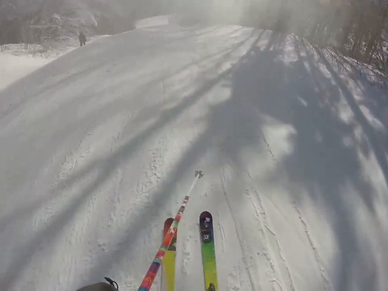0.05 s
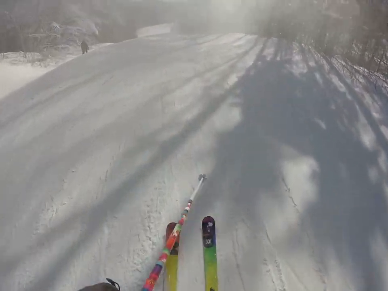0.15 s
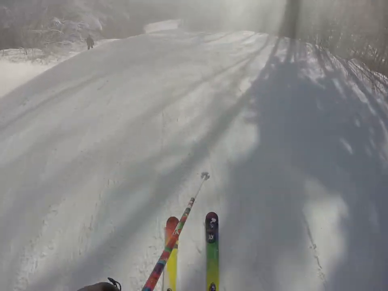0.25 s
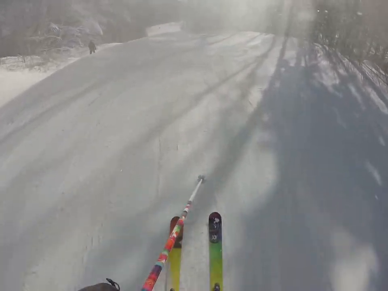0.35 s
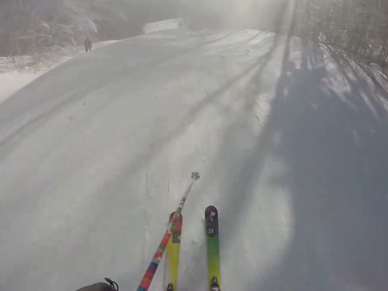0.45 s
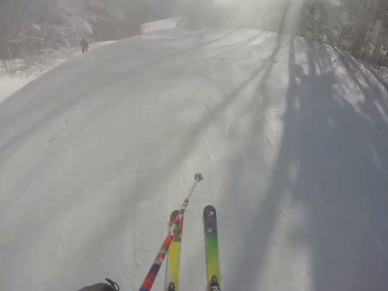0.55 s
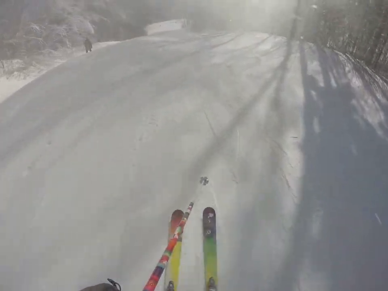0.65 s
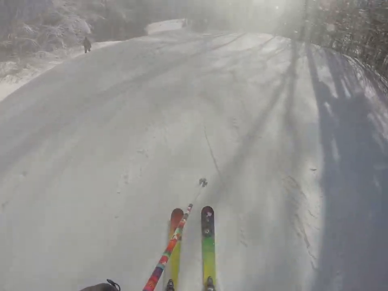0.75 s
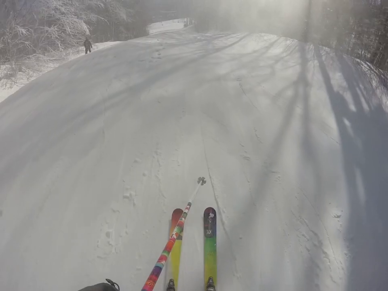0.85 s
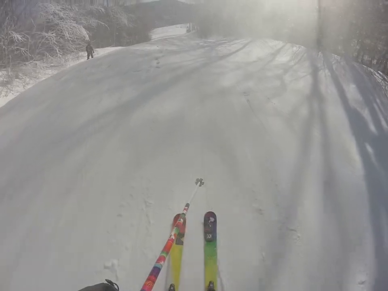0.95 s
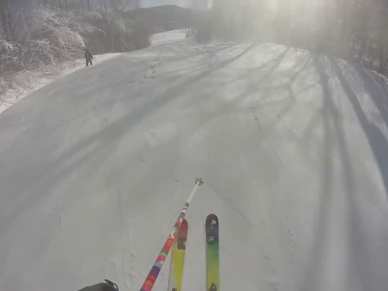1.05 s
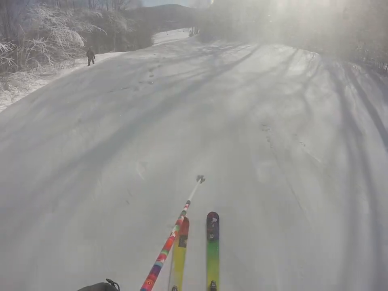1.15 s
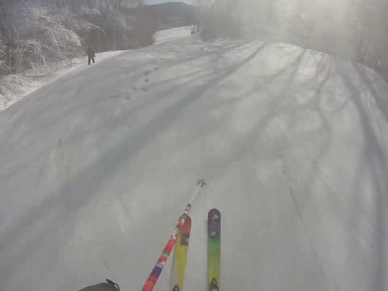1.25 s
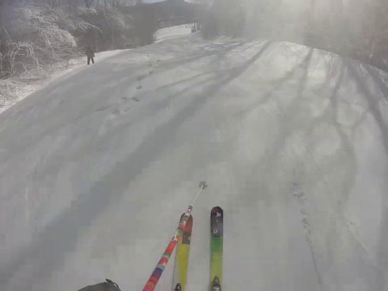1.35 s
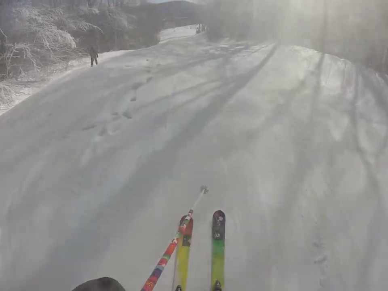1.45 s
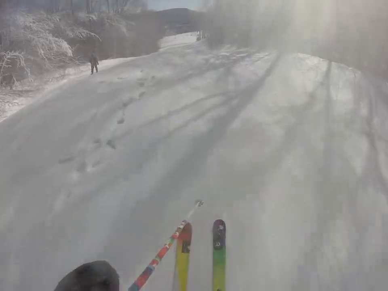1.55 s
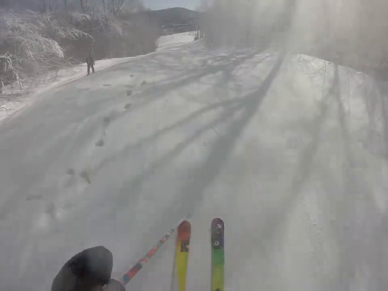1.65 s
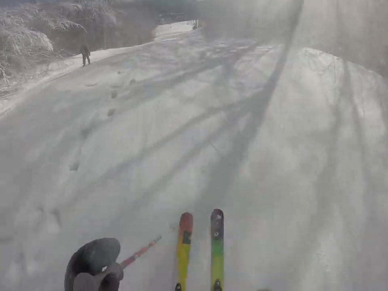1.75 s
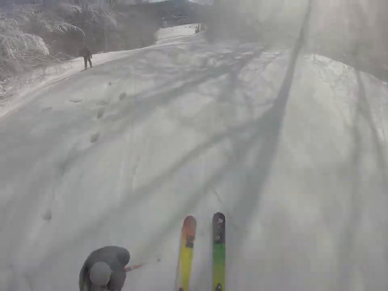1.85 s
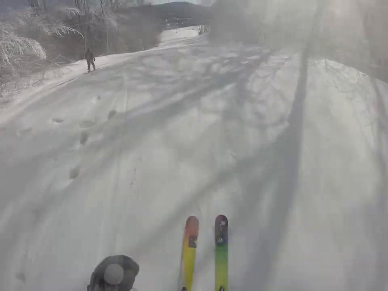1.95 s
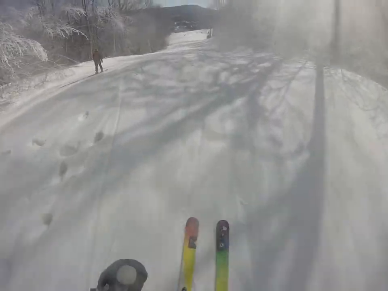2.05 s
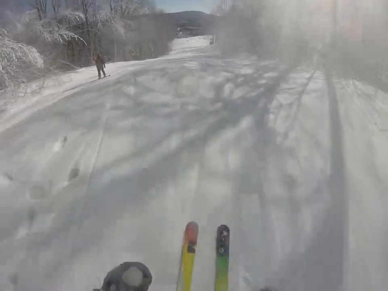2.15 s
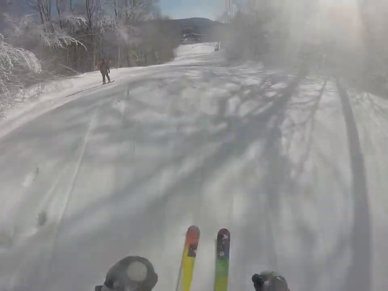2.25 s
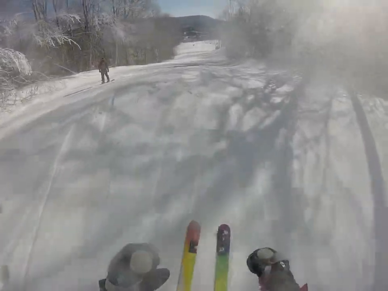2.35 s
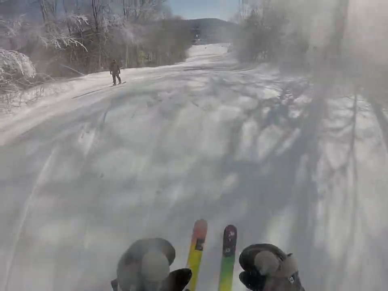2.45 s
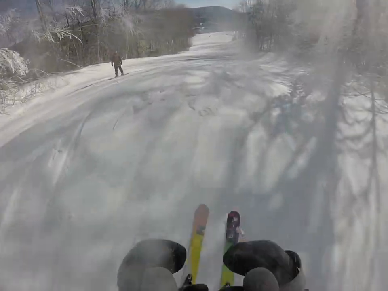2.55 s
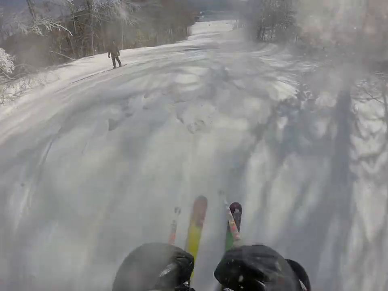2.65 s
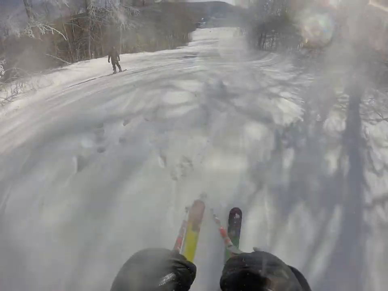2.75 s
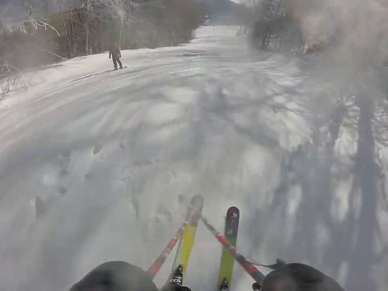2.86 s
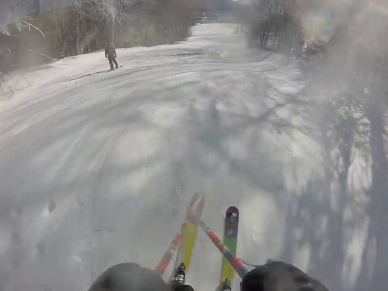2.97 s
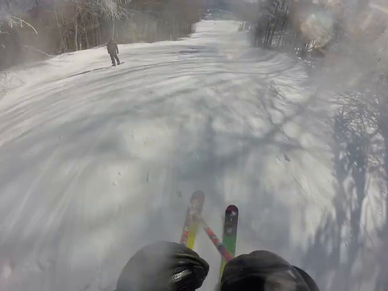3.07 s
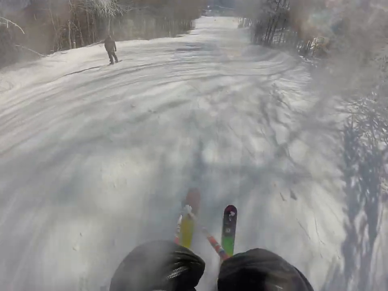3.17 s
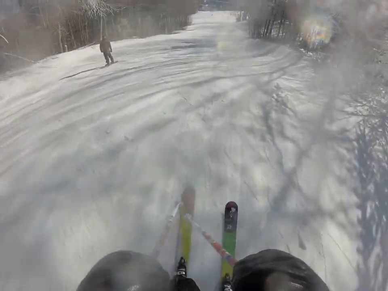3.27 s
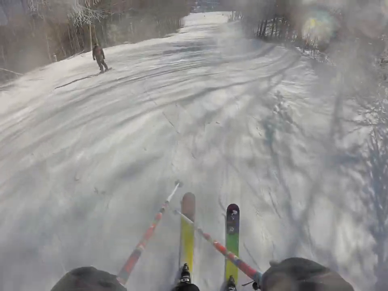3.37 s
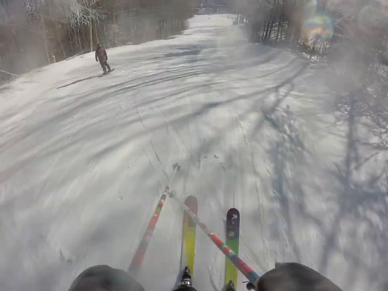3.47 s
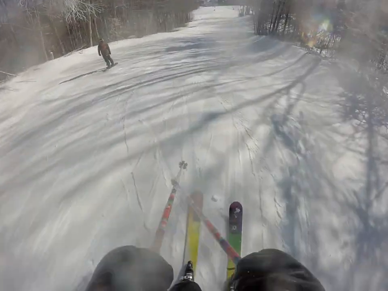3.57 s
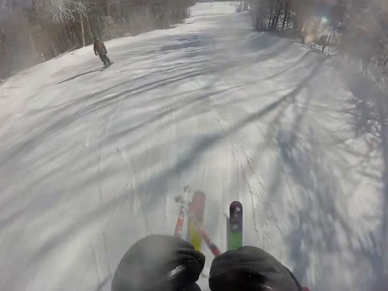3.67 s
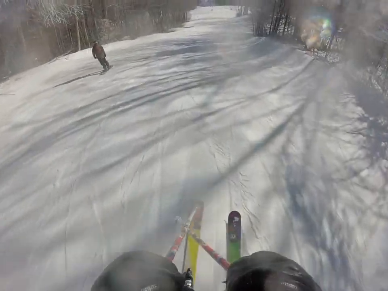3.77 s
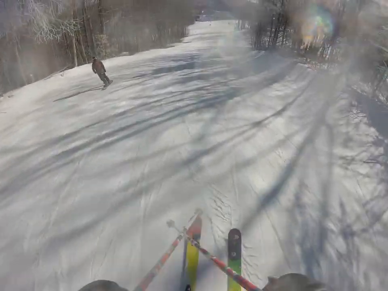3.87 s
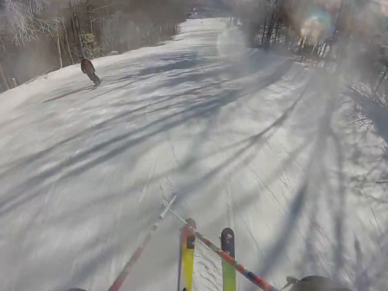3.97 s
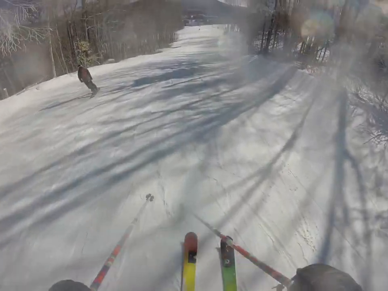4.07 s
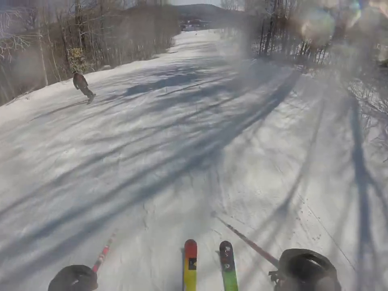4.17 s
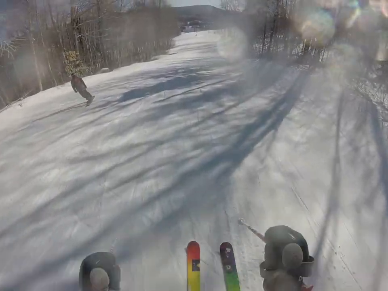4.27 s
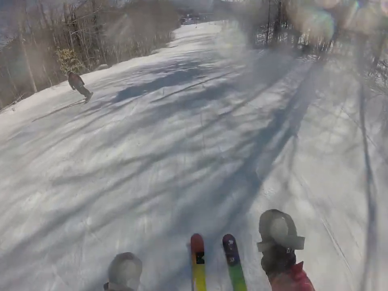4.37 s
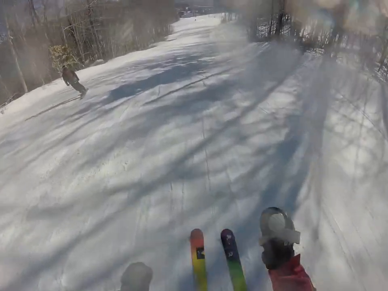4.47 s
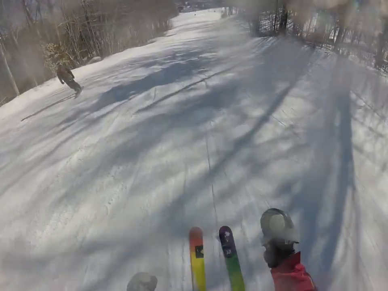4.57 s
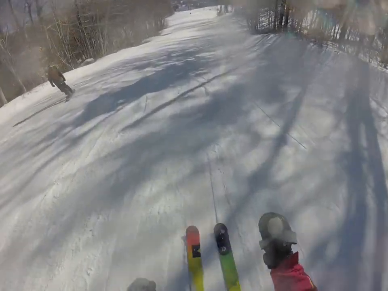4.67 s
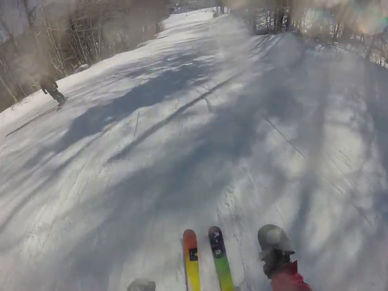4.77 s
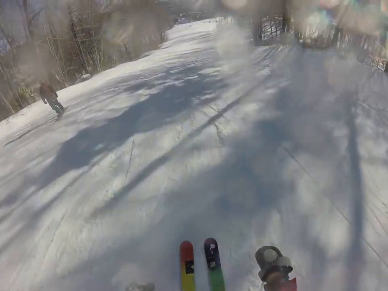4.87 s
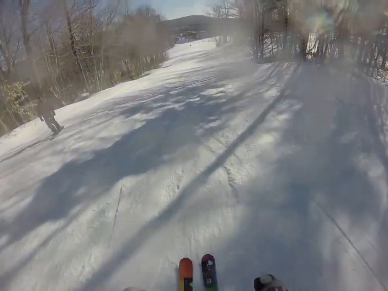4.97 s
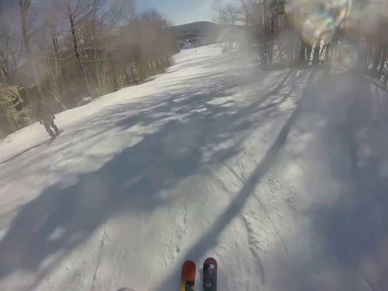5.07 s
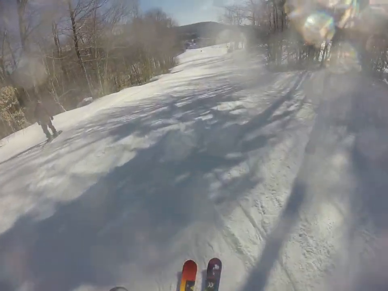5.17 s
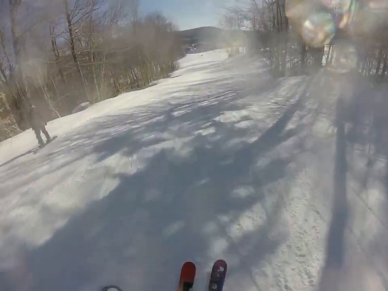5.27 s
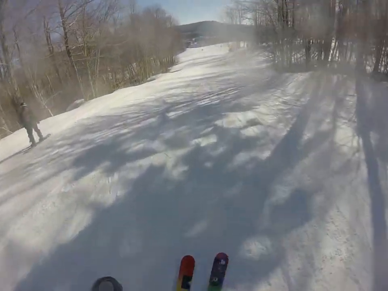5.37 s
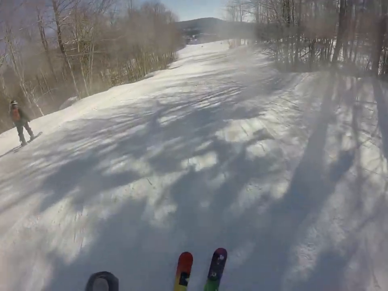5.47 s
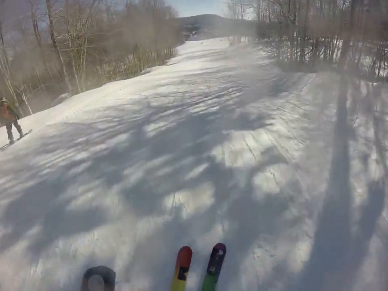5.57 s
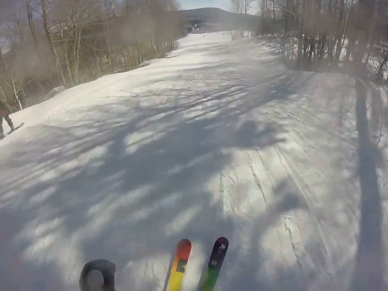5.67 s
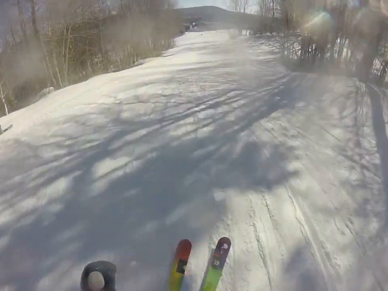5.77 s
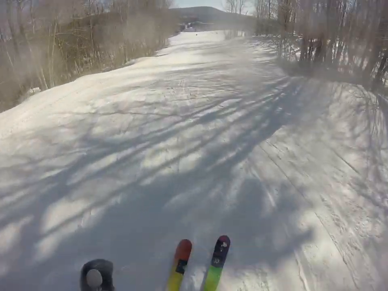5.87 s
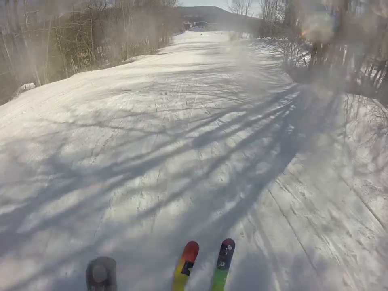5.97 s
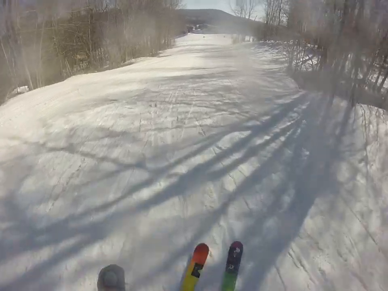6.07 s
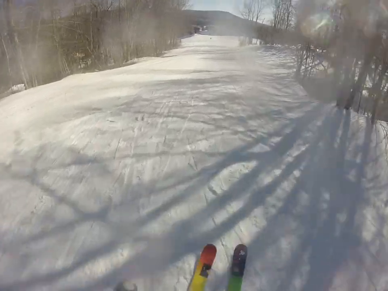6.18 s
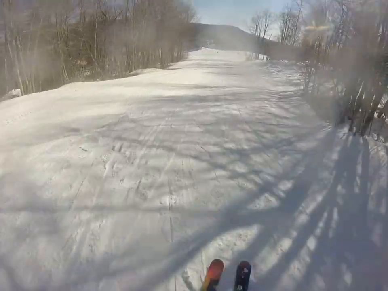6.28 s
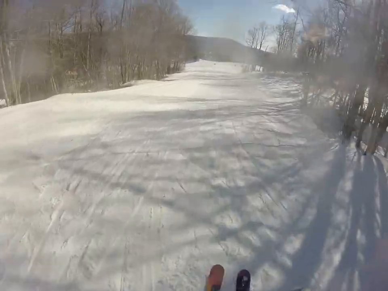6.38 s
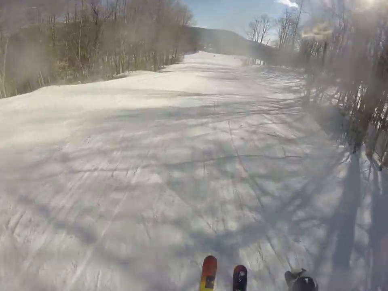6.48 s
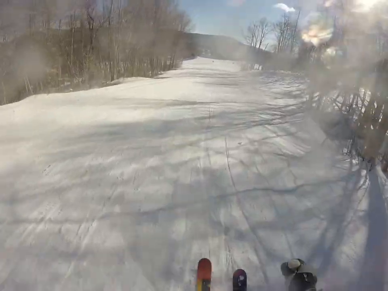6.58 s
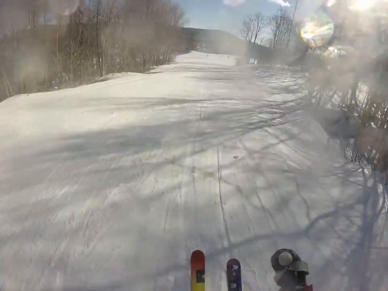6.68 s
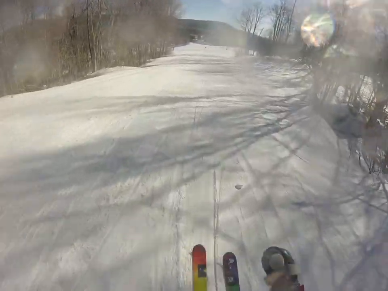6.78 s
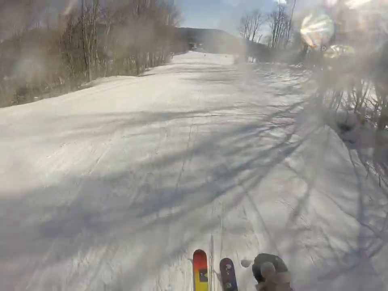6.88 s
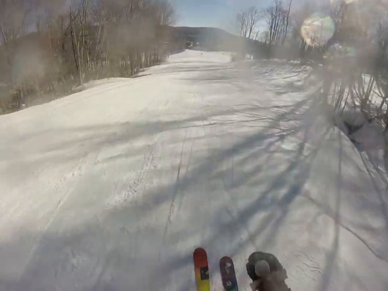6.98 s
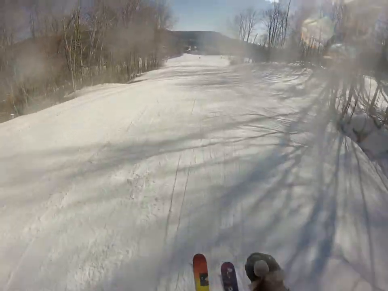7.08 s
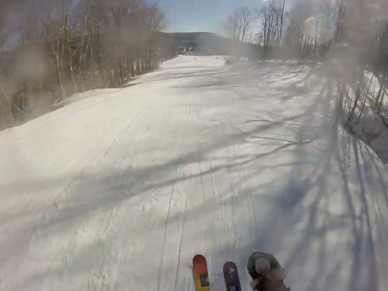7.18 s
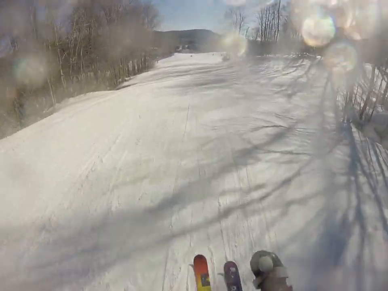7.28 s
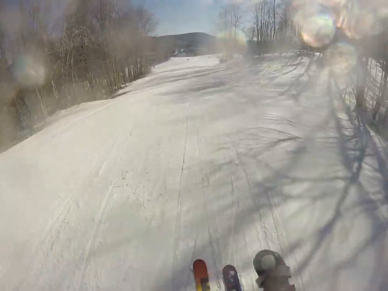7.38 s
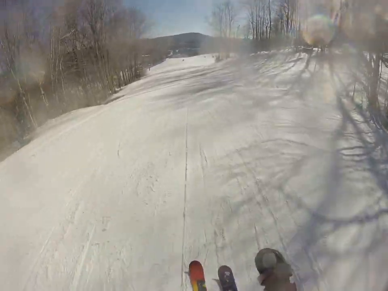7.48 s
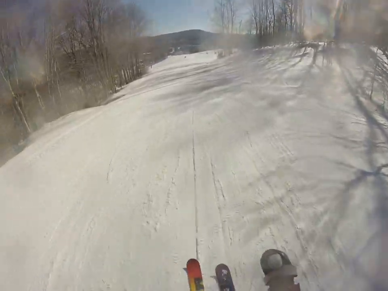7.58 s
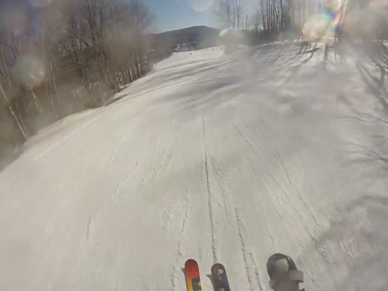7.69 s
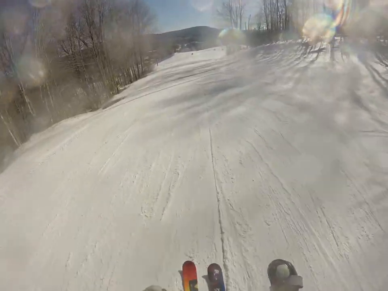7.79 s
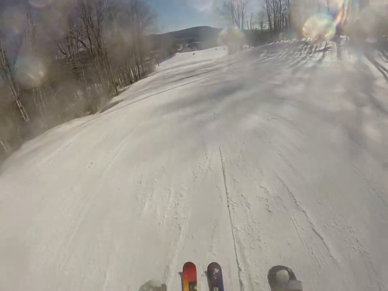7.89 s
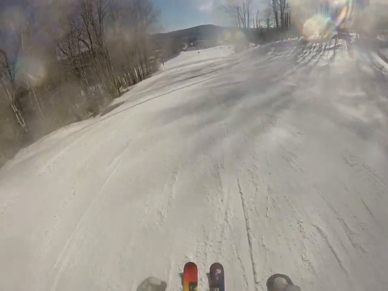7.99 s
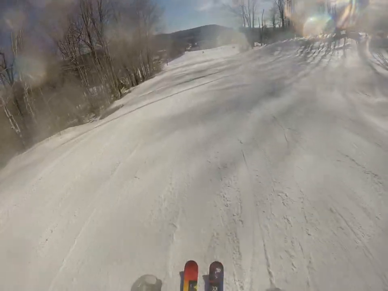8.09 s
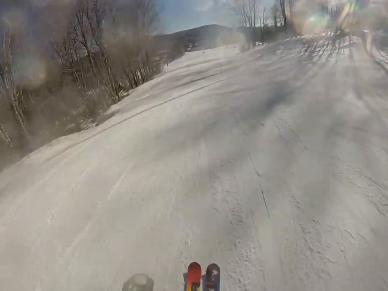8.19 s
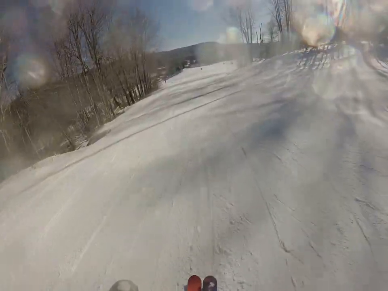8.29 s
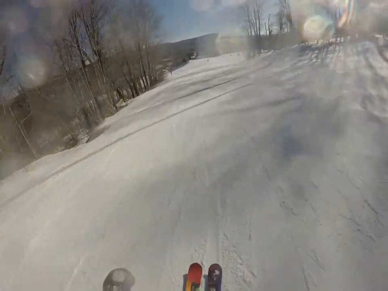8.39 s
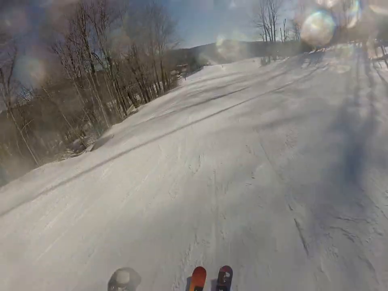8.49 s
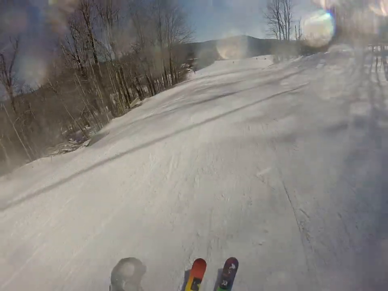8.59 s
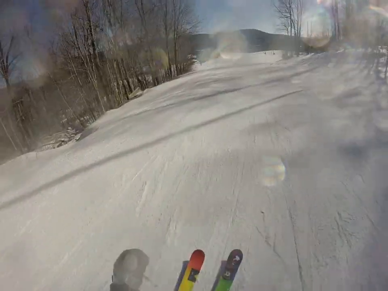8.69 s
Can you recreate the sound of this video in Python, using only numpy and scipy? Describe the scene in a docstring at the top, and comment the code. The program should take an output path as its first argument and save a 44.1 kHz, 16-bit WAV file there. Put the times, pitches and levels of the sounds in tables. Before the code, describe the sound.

Icy spray patters on the microphone over sliding skis and gusty wind; thumps and clacks follow, then smoother skiing.

```python
"""Ice grains from a plume of blown snow pelt a skier's body-worn camera, as filtered random impacts.
They come in flurries and stop at 3.5 s; larger pellets, as decaying noise ticks, last until about 4 s.
The skis hiss throughout, as dense crumbling grains, with clacks and two pole tinks from struck resonances.
Knocks and a tremble drive the mount's resonances; wind is shaped noise in gusts, with faint sine whistles."""
import sys
import numpy as np
from scipy import signal
from scipy.fft import rfft, irfft, next_fast_len
from scipy.io import wavfile
from scipy.ndimage import uniform_filter1d

SR = 44100
rng = np.random.default_rng(int(sys.argv[2]) if len(sys.argv) > 2 else 0)


def bounce(signal):
    """Save signal as a 16-bit WAV file at the path given by the first command-line argument."""
    frames = np.transpose(np.atleast_2d(signal))
    limited = np.clip(frames, -1, 1)
    pcm = np.round(limited * 32767).astype(np.int16)
    wavfile.write(sys.argv[1], SR, pcm)


N = 385434
TIME = np.arange(N) / SR  # s

# blown snow reaching the housing, before clumping: t/s, level/dB
SPRAY_LEVEL = [(0.0, -45.5), (0.14, -43), (0.18, -52), (0.24, -31.5), (0.75, -30.5), (0.87, -23),
               (1.0, -30), (1.08, -25.5), (1.18, -35), (1.25, -28.5), (1.56, -24.5), (2.08, -29),
               (2.1, -36.5), (2.25, -25), (2.27, -30), (2.6, -23), (2.93, -32), (2.99, -28.5), (3.02, -38),
               (3.16, -35), (3.48, -47), (3.52, -65)]
# dense flurries: start/s, length/s, lift/dB
SPRAY_FLURRIES = [(0.692, 0.021, 8.5), (0.793, 0.023, 4), (1.07, 0.032, 3), (1.25, 0.04, 2.5),
                  (1.565, 0.031, 4.5), (1.622, .012, 4), (1.901, 0.076, 4.5), (2.43, .06, 1.5)]
# spray spectrum: f/Hz, gain/dB
SPRAY_SPECTRUM = [(350, -45), (600, -25), (950, -14.5), (1250, -4.5), (1450, 1), (2300, 2.5), (3000, 4),
                  (3600, -2), (4700, -2.5), (5600, -5), (8200, -7), (11000, -6), (14500, -10),
                  (15500, -10.5)]
# thin housing walls set ringing by ice: f/Hz, width/Hz, gain/dB
WALL_MODES = [(847, 56, 12), (1026, 64, 5), (1814, 220, -1), (2350, 280, 0.5), (2790, 140, -7),
              (4270, 290, -8), (6770, 260, -2.5), (7500, 180, -6.5), (8960, 410, -2)]
# skis on snow, louder where they bite in a turn, before flutter: t/s, level/dB
GLIDE_LEVEL = [(0, -35.5), (2.6, -38), (3.55, -45.5), (3.92, -43), (4.12, -40), (4.9, -41.5), (5.35, -36.5),
               (5.9, -37), (6.25, -40), (6.45, -37.5), (6.85, -37.5), (7.1, -39.5), (7.8, -39.5),
               (8.15, -41.5), (8.6, -40)]
# glide spectrum: f/Hz, gain/dB
GLIDE_SPECTRUM = [(450, -10), (750, -7.5), (1250, -4.5), (1500, 2), (2100, -2), (2800, 2), (3500, -3.5),
                  (4300, -6.5), (4900, -17), (6200, -22), (7000, -19), (8300, -26.5), (11000, -30.5),
                  (15000, -45)]
# gusts on the microphone: middle/s, length/s, lift/dB
WIND_GUSTS = [(0.104, 0.6, 2), (.9, 1.5, 3), (2.354, 0.74, 12.5), (3.15, 1, 6), (4.57, .14, 5.5),
              (6.345, 0.11, 6), (6.877, 0.34, 10.5), (7.25, 0.41, 2.5), (8.538, 0.11, 15.5)]
# air rushing past, weakest in the crouch, before flicker: t/s, level/dB
RUSH_LEVEL = [(0, -41.5), (2.4, -41.5), (3.5, -45), (4.4, -42.5), (5.3, -40), (7.4, -39), (8.7, -41)]
# wind spectrum: f/Hz, gain/dB
WIND_SPECTRUM = [(10, -7), (22, 4.5), (45, -3.5), (65, 3.5), (90, -8.5), (125, -8.5), (180, -12),
                 (250, -11), (330, -18.5), (430, -24.5), (700, -32), (1500, -70)]
# free swing of the mount: f/Hz, width/Hz, gain/dB
SWING_MODE = [(60, 5.8, 0)]
# faint whistle of the air: f/Hz, relative level/dB
WHISTLE_TONES = [(687, -1), (1028, -2), (1254, -1)]
# largest ice pellets: t/s, impact size/dB before PELLET_GAIN_DB
LARGE_PELLETS = [(.7412, -9.5), (0.797, -11), (.8894, -5), (1.0282, -7), (1.084, -9), (2.858, -10),
                 (2.895, -9), (2.9347, -8), (3.1424, -19), (3.467, -20.5), (3.482, -19.5), (3.6593, -15),
                 (3.6632, -12.5), (3.903, -19.5)]
# showers of smaller pellets: start/s, end/s, rate/(pellets/s), typical size/dB before PELLET_GAIN_DB
PELLET_SHOWERS = [(.25, 2.95, 40, -21), (2.95, 3.45, 35, -27), (3.5, 4.06, 90, -39.5),
                  (3.635, 3.89, 60, -25), (3.752, 3.8, 120, -24.5)]
# pellet spectrum: f/Hz, gain/dB
PELLET_SPECTRUM = [(600, -22), (2300, 3), (3800, 1.5), (6500, 0.5), (11500, 0.5), (16000, -5.5)]
# hard bits of snow and loose gear: t/s, peak/dB before CLACK_GAIN_DB
CLACK_HITS = [(0.7407, -23), (1.49, -3), (2.0423, -8.5), (2.917, -20.5), (3.0842, -19), (3.2986, -11),
              (3.407, -19), (3.5319, -22), (3.639, -14), (3.6585, -15.5), (3.704, -19), (3.8146, -13.5),
              (3.903, -20), (4.6792, -18), (4.9904, -16.5), (5.912, -20.5), (6.352, -21), (6.856, -15.5),
              (7.7737, -26), (8.4756, -13.5)]
# rattling housing: f/Hz, width/Hz, gain/dB
HOUSING_MODES = [(1210, 250, -3), (1940, 260, 9), (2364, 460, 15), (2550, 320, 0), (4400, 700, 4)]
# knocks on the mount: t/s, thud peak before swing/dB, contact/s, rattle peak/dB
MOUNT_KNOCKS = [(2.735, -2, 0.0096, -7.5), (2.880, -20.5, 0.0044, -24), (3.056, -14, 0.0085, -22),
                (3.072, -7.5, 0.004, -18.5), (3.074, -3, 0.0115, -22), (3.181, -6, 0.00414, -9.5),
                (3.293, -1.5, 0.0089, -15), (3.377, -10, 0.0045, -15.5), (3.459, -16.5, 0.0045, -25.5),
                (3.6244, -4.5, 0.014, -20.5), (3.736, -4, 0.00424, -6), (3.803, -3, 0.0097, -23)]
# mount and the body behind it: f/Hz, width/Hz, gain/dB
MOUNT_MODES = [(60.7, 29, 0), (122, 210, -10), (241, 74, -0.5), (310, 46, -6), (472, 85, 2.5)]
# light metallic tinks of the pole tips: t/s, peak/dB
POLE_TINKS = [(3.9808, -13.5), (4.042, -27)]
# pole: f/Hz, width/Hz, gain/dB
POLE_MODES = [(6400, 900, 0.5), (9600, 900, -1), (11050, 550, 7), (12700, 580, -14)]

# a thicker plume brings more grains and heavier ones
THICK_DB, THICK_GRAINS_PER_S, RATE_DOUBLING_DB = -26, 5500, 6
HEAVY_AT_THICK_DB, HEAVY_DB_PER_DB = -3, 0.24
SPRAY_ENDS_S, SPRAY_FADE_S = 3.5, 0.053
# harder bite adds edge hiss; flat, light skis sound duller
CRUISE_DB, EDGE_AT_CRUISE_DB, EDGE_DB_PER_DB = -39.5, -16, 0.5
FLAT_DB, FLAT_TOP_HZ = -43, 2780
# faster air is louder and brighter
BUFFET_BASE_DB, RUSH_USUAL_DB = -35.5, -41.5
RUSH_BRIGHT_HZ, BRIGHT_DB_PER_DB = 380, 1
# mount tremble on the fast straight run: rise, hold, fall
SHAKE_DB, SHAKE_FULL_S, SHAKE_ENDS_S = -29, 1.81, 4.0
SHAKE_RISE_DB_PER_S, SHAKE_FALL_DB_PER_S = 12, 150
PELLET_SPREAD_DB, PELLET_DECAY_S, PELLET_GAIN_DB = 1, 0.00082, -5.5
CLACK_GAIN_DB = -0.5
# a long shove leaves the mount swinging, a short tap hardly does
SHOVE_S, SWING_AT_SHOVE_DB, SWING_DB_PER_DOUBLING = 0.015, -8, 23
TOP_HZ = 15350


def undb(db):
    """Decibels to gain."""
    return 10 ** (np.asarray(db) / 20)


def unit(x):
    """Scale to rms 1."""
    return x / np.sqrt(np.mean(x ** 2))


def level_curve(table):
    """Join (t/s, level/dB) points by straight lines."""
    s, db = np.transpose(table)
    return np.interp(TIME, s, db)


def add(track, s, sound, peak_db):
    """Mix a sound in at a time, scaled to a peak level."""
    i = int(s * SR)
    scaled = undb(peak_db) * sound / np.abs(sound).max()
    track[i:i + len(sound)] += scaled[:N - i]


def walk(rate_hz):
    """Random levels held 1 / rate_hz and smoothed twice; spread near 1."""
    k = max(int(SR / rate_hz), 2)
    held = rng.standard_normal(N)[np.arange(N) // k]
    return 1.3 * uniform_filter1d(uniform_filter1d(held, k), k)


def cut(x, hz, kind, order=2):
    """Butterworth low-pass or high-pass."""
    return signal.sosfilt(signal.butter(order, min(hz, SR / 2 - 1), kind, fs=SR, output="sos"), x)


def colour(x, points):
    """Shape the spectrum through (f/Hz, gain/dB) points, straight in log frequency."""
    hz, db = np.transpose(points)
    size = next_fast_len(len(x))
    f = np.maximum(np.arange(size // 2 + 1) * SR / size, 1)
    gain = undb(np.interp(np.log(f), np.log(hz), db))
    return irfft(rfft(x, size) * gain, size)[:len(x)]


def ring(x, modes):
    """Drive parallel damped resonances."""
    return sum(undb(db) * signal.lfilter(*signal.iirpeak(hz, hz / width, fs=SR), x)
               for hz, width, db in modes)


def split(x, hz):
    """Parts below and above a frequency, each at rms 1."""
    low = colour(x, [(hz / 2, 0), (hz * .85, -1), (hz * 1.2, -18), (hz * 2, -60)])
    return unit(low), unit(x - low)


def random_sizes(spread_db):
    """Uneven impact gains, limited to two spreads either way."""
    return undb(spread_db * np.clip(rng.standard_normal(N), -2, 2))


def grains(rate, spread_db, decay_s):
    """Random uneven impacts, each a tiny crumbling burst, at even mean power."""
    chance = np.clip(rate / SR, 1e-4, 1)
    sizes = random_sizes(spread_db)
    impacts = (rng.random(N) < chance) * sizes ** 2 / chance
    energy = signal.lfilter([1], [1, -np.exp(-2 / (decay_s * SR))], impacts)
    return unit(np.sqrt(energy) * rng.standard_normal(N))


def crack(decay_s, size=2048):
    """A contact crumbles away as decaying noise."""
    return rng.standard_normal(size) * np.exp(-TIME[:size] / decay_s)


def spray():
    """Grains strike in clumps; heavy ones sound the housing's low resonances, fine ones sizzle."""
    level_db = level_curve(SPRAY_LEVEL)
    above_thick_db = level_db - THICK_DB
    rate = THICK_GRAINS_PER_S * 2 ** (above_thick_db / RATE_DOUBLING_DB)
    hits = grains(rate, spread_db=2.5, decay_s=0.00015)
    heavy, fine = split(colour(hits + ring(hits, WALL_MODES), SPRAY_SPECTRUM), 3680)

    clumps_db = 1.25 * walk(60) + 1.63 * walk(180)
    for s, length, lift_db in SPRAY_FLURRIES:
        corners_s = s + length * np.array([0, .15, .85, 1])
        clumps_db = clumps_db + lift_db * np.interp(TIME, corners_s, [0, 1, 1, 0])
    heavy_db = HEAVY_AT_THICK_DB + HEAVY_DB_PER_DB * above_thick_db + 0.88 * walk(130)
    fine_db = 1.1 * walk(70)
    leaving = np.interp(TIME, [SPRAY_ENDS_S, SPRAY_ENDS_S + SPRAY_FADE_S], [1, 0])
    return leaving * undb(level_db + clumps_db) * (undb(heavy_db) * heavy + undb(fine_db) * fine)


def glide():
    """Bases crush countless snow crystals; the ribbed surface flutters the level, edges add hiss."""
    level_db = level_curve(GLIDE_LEVEL)
    crushing = grains(14000, spread_db=-0.5, decay_s=0.00057)
    base, edge = split(colour(crushing, GLIDE_SPECTRUM), 5300)
    edge_db = EDGE_AT_CRUISE_DB + EDGE_DB_PER_DB * (level_db - CRUISE_DB)
    dull = colour(base, [(FLAT_TOP_HZ, 0), (2 * FLAT_TOP_HZ, -14)])
    flat = np.clip((CRUISE_DB - level_db) / (CRUISE_DB - FLAT_DB), 0, 1) ** 2
    flutter_db = 0.35 * walk(7) + 0.35 * walk(36) + 0.63 * walk(90)
    return undb(level_db + flutter_db) * ((1 - flat) * base + flat * dull + undb(edge_db) * edge)


def swell(middle_s, length_s):
    """A smooth rise from 0 to 1 and back."""
    return np.cos(np.pi * np.clip((TIME - middle_s) / length_s, -.5, .5)) ** 2


def wind():
    """Gusts and eddies buffet the microphone; air rushes above them, brighter when faster."""
    rush_db = level_curve(RUSH_LEVEL)
    buffet_db = BUFFET_BASE_DB + sum(lift_db * swell(s, length) for s, length, lift_db in WIND_GUSTS)
    buffet, rush = split(colour(rng.standard_normal(N), WIND_SPECTRUM), 93.5)
    body = colour(rush, [(RUSH_BRIGHT_HZ / 2, 0), (RUSH_BRIGHT_HZ * 0.78, 0), (RUSH_BRIGHT_HZ * 2, -40)])
    bright_db = BRIGHT_DB_PER_DB * (rush_db - RUSH_USUAL_DB)
    rush = body + undb(bright_db) * (rush - body)
    eddies_db = 1.8 * walk(8)
    flicker_db = .7 * walk(6) + .8 * walk(25)
    return undb(buffet_db + eddies_db) * buffet + undb(rush_db + flicker_db) * rush


def shake():
    """The ride keeps the mount trembling at its resonance: low-passed noise through the swing mode."""
    level_db = (SHAKE_DB - SHAKE_RISE_DB_PER_S * np.maximum(SHAKE_FULL_S - TIME, 0)
                - SHAKE_FALL_DB_PER_S * np.maximum(TIME - SHAKE_ENDS_S, 0))
    return undb(level_db) * unit(cut(ring(rng.standard_normal(N), SWING_MODE), 92, "low"))


def whistle():
    """Thin sine tones of the air, wavering in pitch and level, fade after 0.55 s."""
    level_db = level_curve([(0, -50), (.55, -47.5), (.9, -57), (3, -73)])
    tones = np.zeros(N)
    for hz, db in WHISTLE_TONES:
        tone_db = db + 2 * walk(21.0)
        pitch_hz = hz * (1 + .004 * walk(63))
        tones += undb(tone_db) * np.sin(2 * np.pi * np.cumsum(pitch_hz) / SR)
    return undb(level_db) * tones


def pellets():
    """Larger ice ticks on the housing and rings its walls, singly and in random showers."""
    chance = rng.random(N)
    sizes = random_sizes(PELLET_SPREAD_DB)
    impacts = np.zeros(N)
    for start, end, rate, db in PELLET_SHOWERS:
        landed = (TIME > start) & (TIME < end) & (chance < rate / SR)
        impacts += undb(db) * sizes * landed
    for s, db in LARGE_PELLETS:
        impacts[int(s * SR)] += undb(db)
    decays = signal.lfilter([1], [1, -np.exp(-1 / (PELLET_DECAY_S * SR))], impacts)
    ticks = decays * rng.standard_normal(N)
    return undb(PELLET_GAIN_DB) * colour(ticks + ring(ticks, WALL_MODES), PELLET_SPECTRUM)


def strike(rattle_db, rattle_s, snap_db):
    """A hard tap snaps and rings the housing, too small to radiate lows; a little rattle follows."""
    contact = undb(rattle_db) * crack(rattle_s)
    contact[0] += 1
    tone = cut(ring(contact, HOUSING_MODES), 1160, "high", order=3)
    snap = cut(crack(0.0024), 3000, "high")
    return unit(cut(tone, 3500, "low")) + undb(snap_db) * unit(snap)


def clacks():
    """Short hard contacts, coloured by the housing."""
    out = np.zeros(N)
    for s, db in CLACK_HITS:
        add(out, s, strike(rattle_db=-24, rattle_s=.003, snap_db=-19), db)
    return undb(CLACK_GAIN_DB) * out


def knocks(size=16384):
    """Jolts push the mount: short contacts reach its higher modes, long ones leave it swinging."""
    out = np.zeros(N)
    for s, db, contact_s, rattle_db in MOUNT_KNOCKS:
        push = -np.sin(np.pi * np.minimum(TIME[:size] / contact_s, 1)) ** 2
        thud = cut(ring(push, MOUNT_MODES), 35, "high", order=1)
        swing_db = db + SWING_AT_SHOVE_DB + SWING_DB_PER_DOUBLING * np.log2(contact_s / SHOVE_S)
        rattle = cut(strike(rattle_db=-24.0, rattle_s=0.0043, snap_db=-21), 2260, "low", order=4)
        add(out, s, thud, db)
        add(out, s, ring(push, SWING_MODE), swing_db)
        add(out, s, rattle, rattle_db)
    return out


def tinks():
    """A glancing touch rings the high modes of a pole."""
    out = np.zeros(N)
    for s, db in POLE_TINKS:
        add(out, s, cut(ring(crack(0.001), POLE_MODES), 4500, "high"), db)
    return out


def scene():
    """Sum all sources in mono, close to the microphone in open air."""
    steady = spray() + glide() + wind() + shake() + whistle()
    contacts = pellets() + clacks() + knocks() + tinks()
    return (steady + contacts)[None]


def record(dry):
    """The camera blocks the deepest sway and cuts the top."""
    swayless = cut(dry, 3.5, "high", order=1)
    return signal.sosfilt(signal.ellip(10, .2, 70, TOP_HZ, fs=SR, output="sos"), swayless)


dry = scene()
out = record(dry)
bounce(out)
```